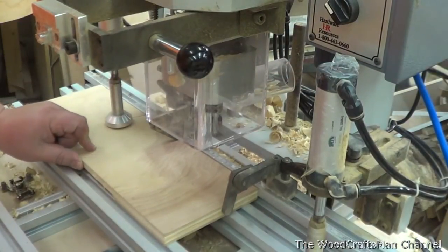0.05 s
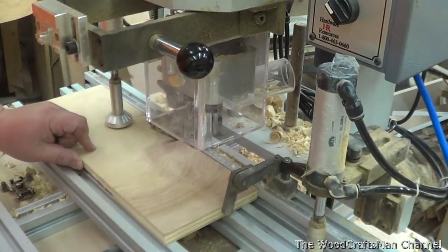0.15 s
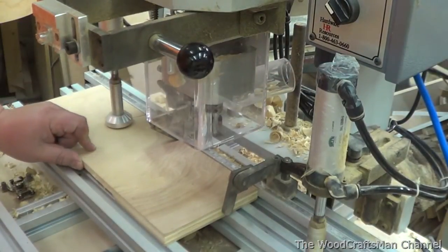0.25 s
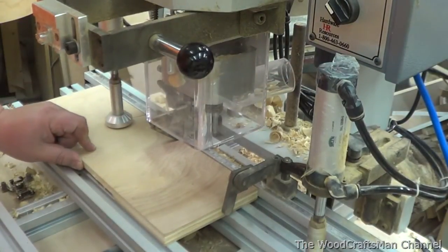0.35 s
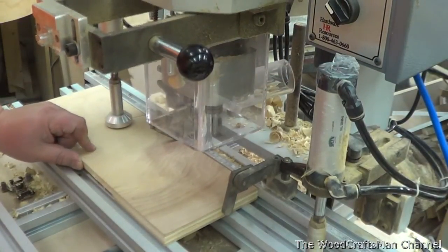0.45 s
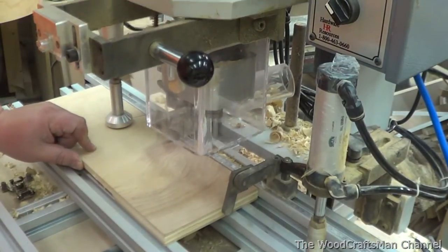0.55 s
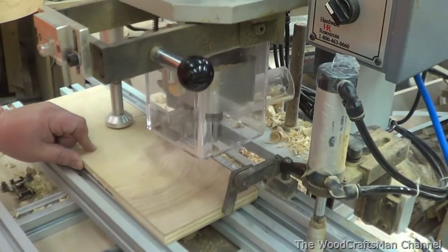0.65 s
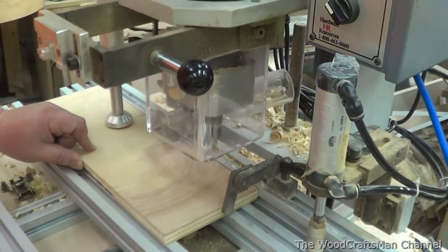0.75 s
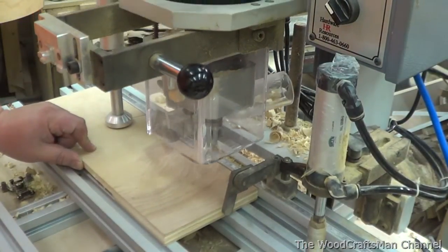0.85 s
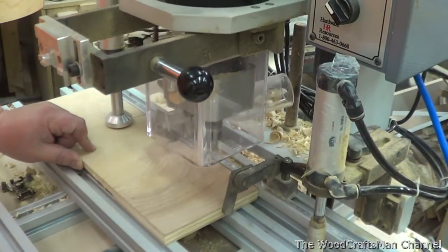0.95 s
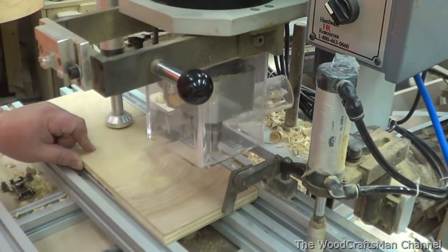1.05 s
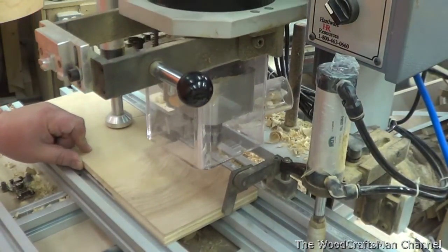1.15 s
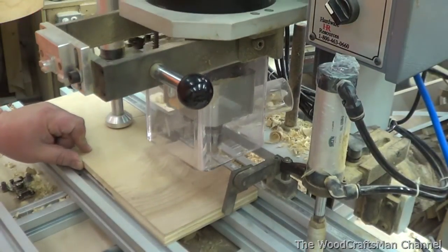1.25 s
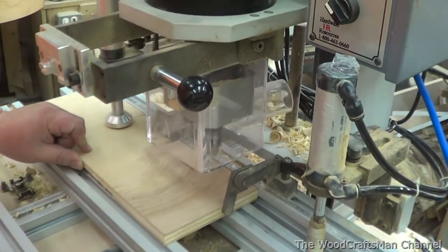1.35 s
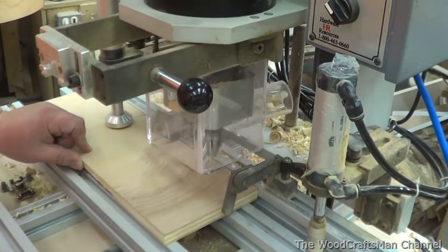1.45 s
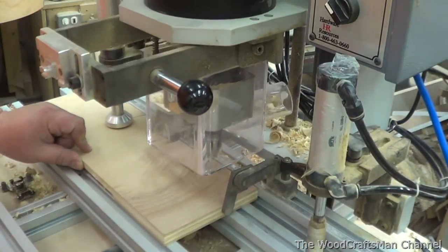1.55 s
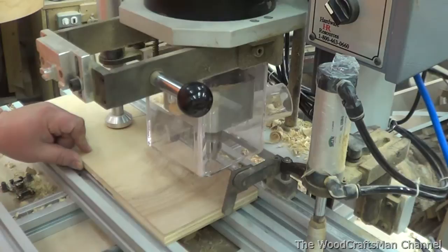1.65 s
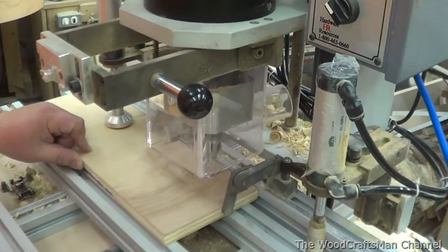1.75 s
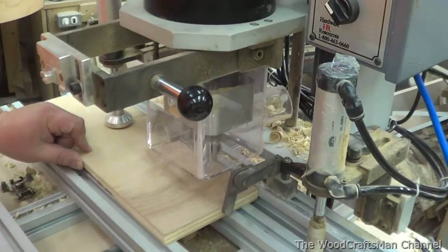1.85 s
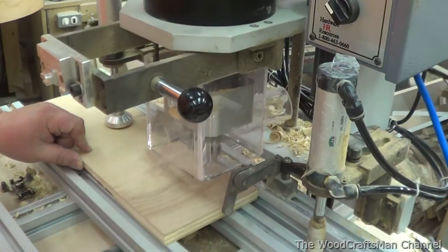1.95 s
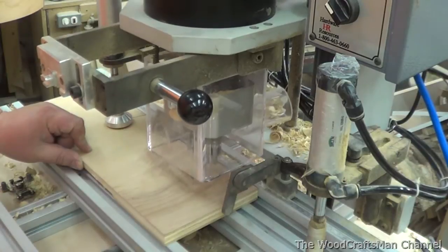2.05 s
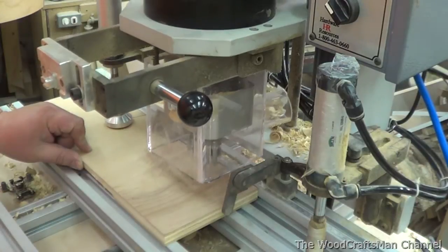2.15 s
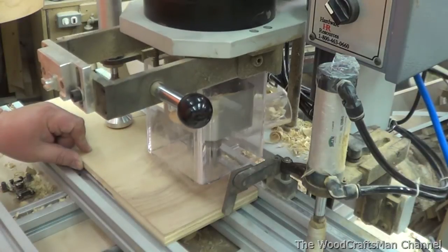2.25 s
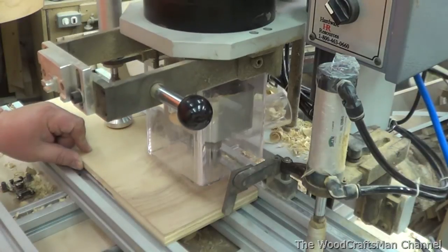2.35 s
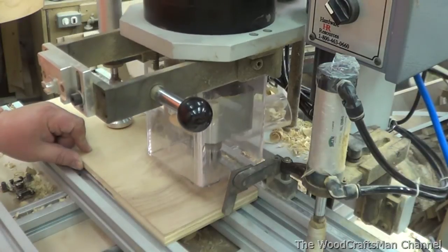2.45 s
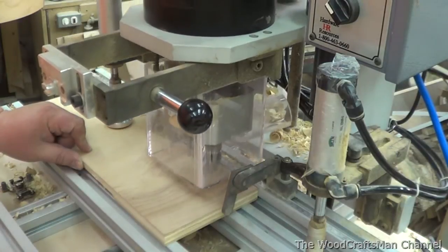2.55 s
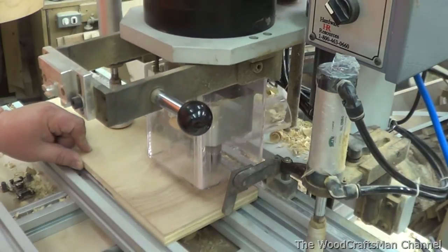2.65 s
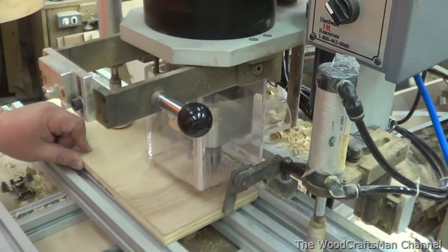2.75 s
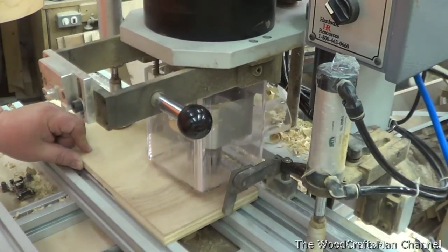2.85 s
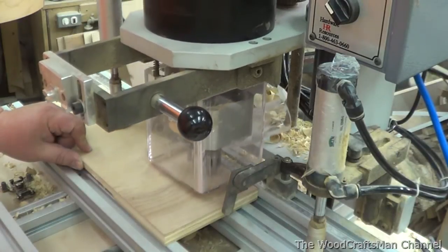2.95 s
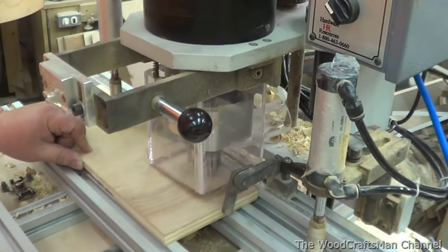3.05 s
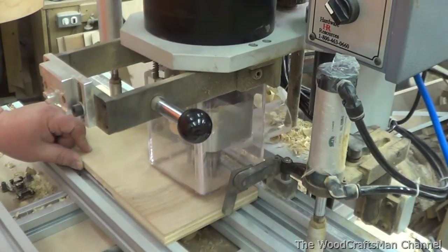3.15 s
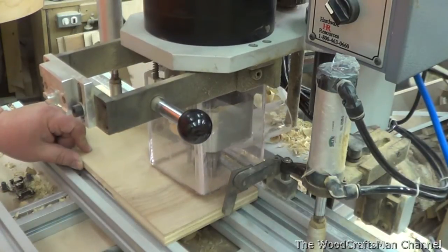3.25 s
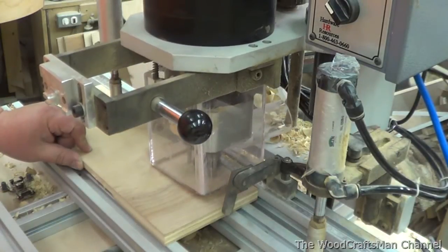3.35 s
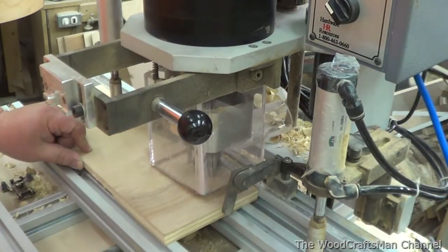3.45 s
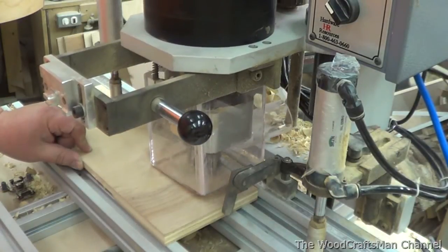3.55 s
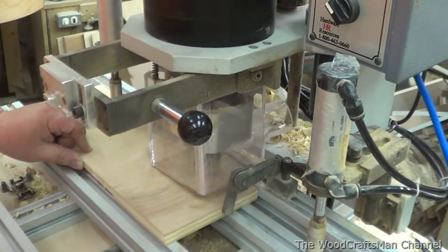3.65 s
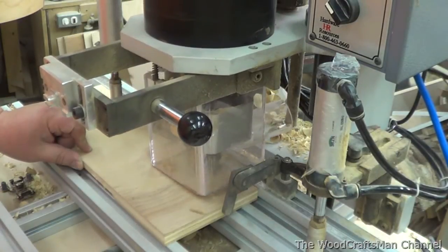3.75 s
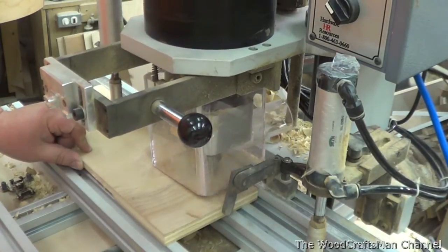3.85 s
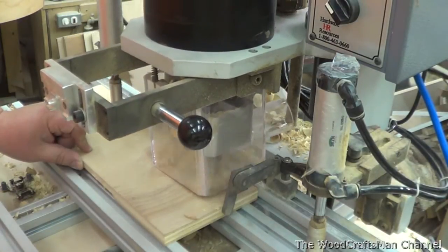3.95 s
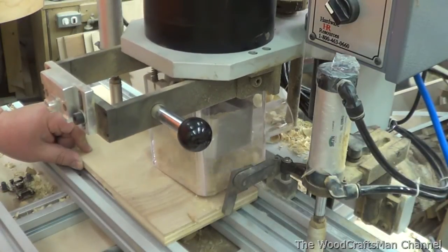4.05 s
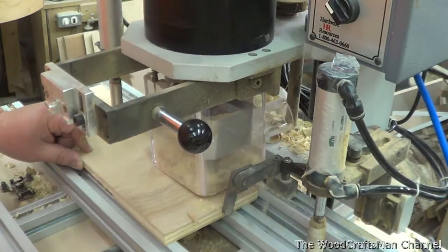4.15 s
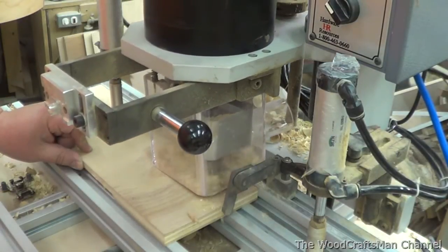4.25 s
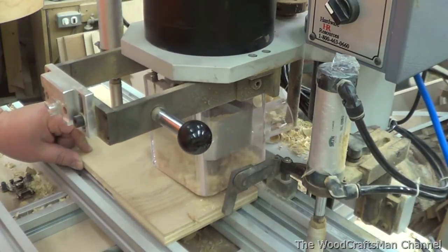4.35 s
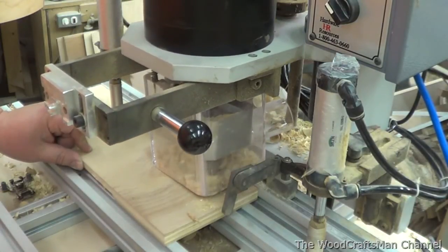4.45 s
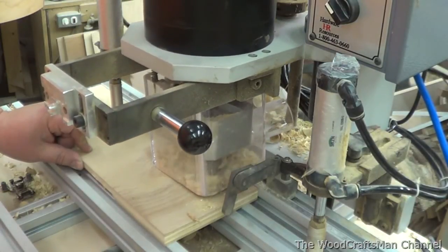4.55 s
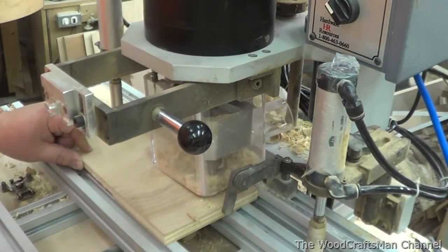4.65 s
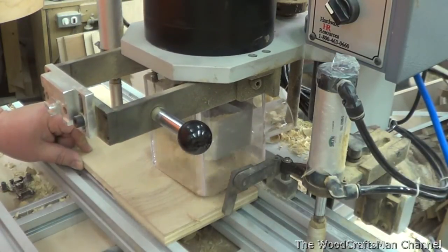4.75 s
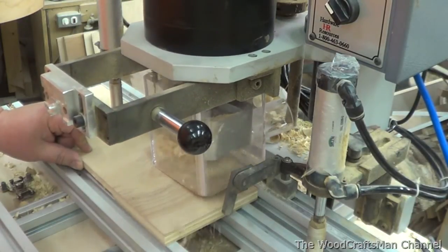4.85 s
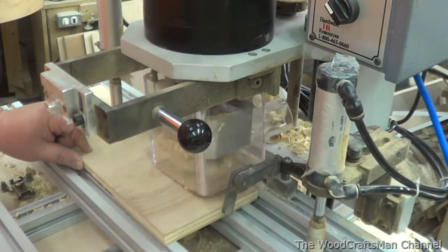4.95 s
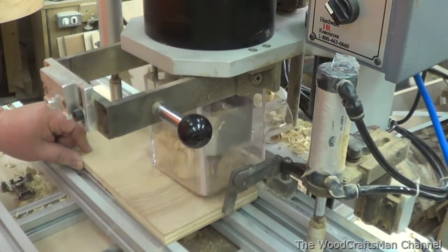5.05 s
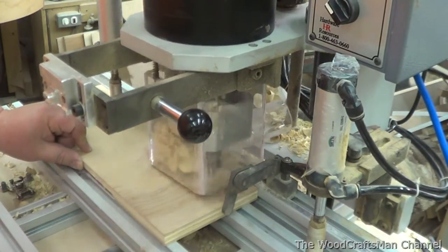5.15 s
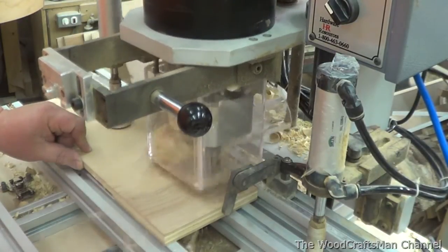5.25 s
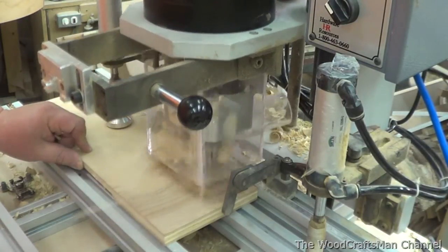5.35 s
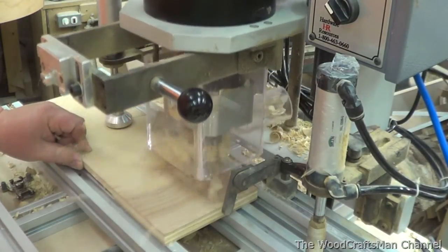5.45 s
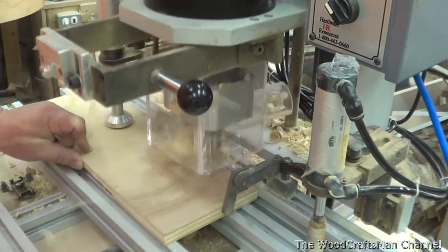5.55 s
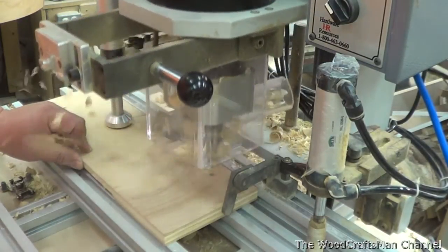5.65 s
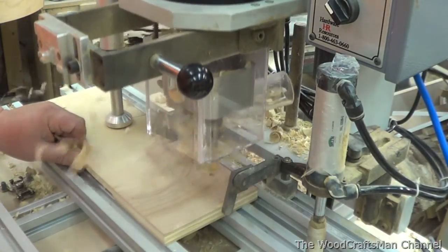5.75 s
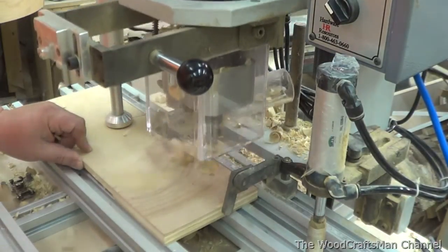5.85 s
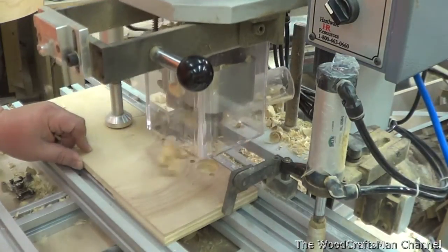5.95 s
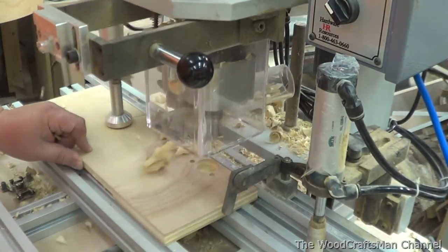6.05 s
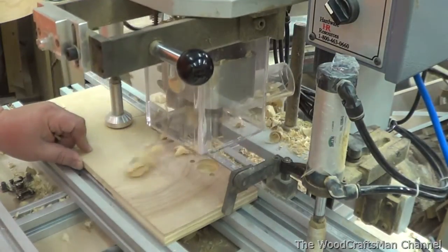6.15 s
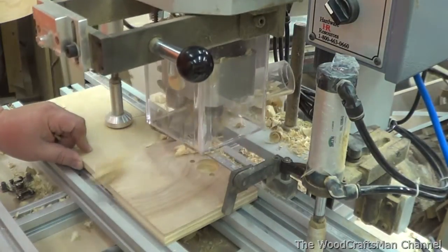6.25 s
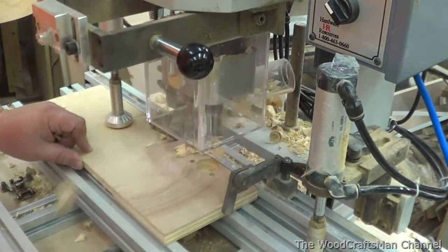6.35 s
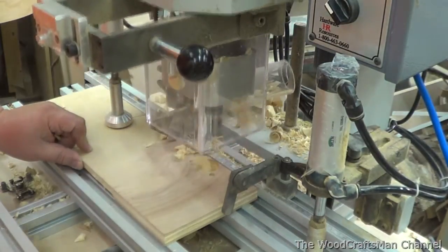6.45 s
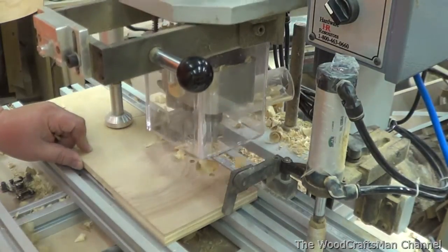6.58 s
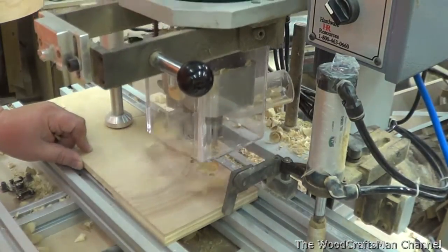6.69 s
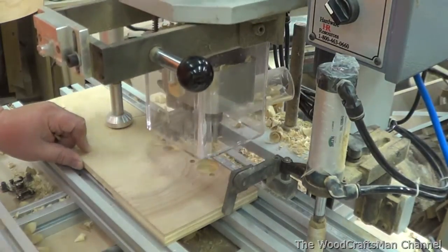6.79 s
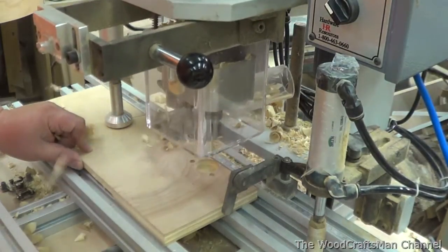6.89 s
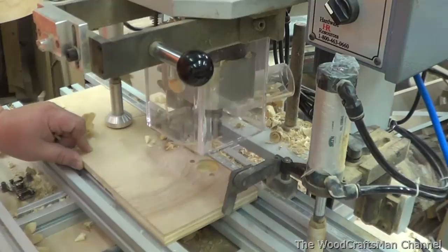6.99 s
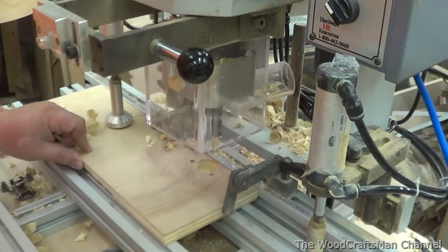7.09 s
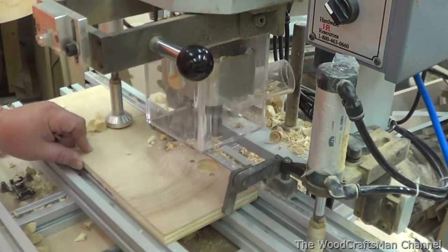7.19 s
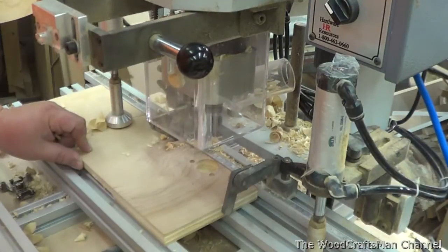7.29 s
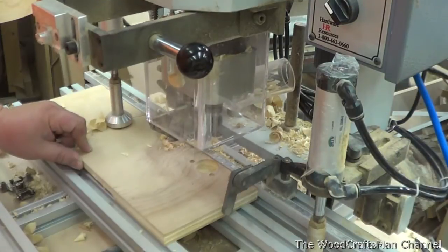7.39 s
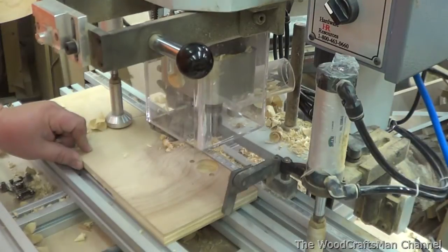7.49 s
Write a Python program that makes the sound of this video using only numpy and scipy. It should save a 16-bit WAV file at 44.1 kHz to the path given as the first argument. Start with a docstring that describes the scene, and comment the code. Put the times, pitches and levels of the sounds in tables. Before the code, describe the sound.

A close, dry stereo workshop pickup with little deep bass and loud sounds squeezed. A low distant-machine murmur, faint mains hum and fading hiss open the scene. At 0.37 s sharp contactor clicks, a tiny air spit and a dull table knock start a geared motor; its howl swoops up by 0.5 s into a steady, gritty metallic rattle with whine. Around 3.1 s bits touch plywood with a shudder and chatter, swelling into a bright tearing rasp from 3.3 to 4.3 s, wavering near 4 s. A harsher ringing scrape grows until 4.76 s. A click cuts power; bright air hiss blasts out, with slowing gears and rubbing bits around 5 s, whistles and a fuller rush from 5.3 to 5.8 s. The coasting rattle sinks. At 6.43 s clicks, a knock and a second howl mark a short jog, off at 6.7 s with a whistling air puff; gears coast down, with a soft knock at 7.3 s.

```python
"""A hinge boring machine, heard close up in a workshop: the motor spins up its gears, the head sinks,
the bits cut a plywood panel, the gears coast down, and the motor is jogged once more.
Gears, cutters and air are noise in their own resonances; shaft tones are sines at multiples of its speed.
Valves and contactors click, the cylinder vents with hiss and whistles, the table gives dull knocks;
behind lie a murmur of distant machines, mains hum and a fading hiss."""
import sys
import numpy as np
from scipy import signal
from scipy.fft import rfft, irfft, next_fast_len
from scipy.io import wavfile
from scipy.ndimage import uniform_filter1d

SR = 44100
rng = np.random.default_rng(int(sys.argv[2]) if len(sys.argv) > 2 else 0)


def master(y):
    """Save y as 16-bit WAV."""
    cut = np.clip(np.atleast_2d(y).T, -1, 1)
    pcm = np.round(cut * 32767)  # scale
    wavfile.write(sys.argv[1], SR, pcm.astype(np.int16))


N = 331664
T, SIZE = np.arange(N) / SR, next_fast_len(N + SR // 4)
HZ = np.fft.rfftfreq(SIZE, 1 / SR)

# Bands in which noises are levelled (Hz)
MIDDLE, TOP, HIGH, ALL = (900, 3000), (5000, 12000), (7000, 15000), (40, 15000)
FULL_SPEED, MAINS_HZ = 59.87, 60  # unloaded shaft in turns per s; mains in Hz

# The motor's runs. Each row: on in seconds, off in seconds, spin-up in seconds, spin-up curvature,
# coasting loss in turns per s2, rattle in dB, howl peak in seconds, howl in dB, howl swell in dB per s
RUNS = [(.375, 4.76, .111, 2.1, 21, -21.2, .483, -15.5, 35),
        (6.425, 6.705, .165, 1.1, 11.6, -23.5, 6.545, -16, 250)]
# The bits shear chips. One row: full in seconds, end in seconds, rasp in dB, strongest tone in dB,
# rise in dB per s, fall in dB per s
CUT = (3.34, 4.28, -17.5, -33, 42, 150)
# The slowing bits rub in their holes. One row, with the columns of CUT
RUBBING = (4.9, 5.18, -25, -44, 45, 70)


def amp(db):
    """Decibels to gain."""
    return 10 ** (np.asarray(db) / 20)


def read(points, hz):
    """Reads a table along log frequency."""
    f, value = np.transpose(points)
    return np.interp(np.log(hz + 1), np.log(f + 1), value)


def held(full, end, db, rise_db_s, fall_db_s):
    """Gain that rises, holds from full to end, and falls."""
    return amp(db - rise_db_s * np.maximum(full - T, 0) - fall_db_s * np.maximum(T - end, 0))


def stage(full, end, rasp_db, tone_db, rise_db_s, fall_db_s):
    """Gains of rasp and tones for one stage of the hole."""
    rasp = held(full, end, rasp_db, rise_db_s, fall_db_s)
    return rasp, held(full, end, tone_db, rise_db_s, fall_db_s)


def drift(fastest_hz):
    """Slow random wander of rms 1, summed from sines of random phase."""
    at = np.arange(0, N + 256, 256) / SR
    rates = fastest_hz * np.linspace(.05, 1, 12)
    wander = sum(np.sin(2 * np.pi * (f * at + rng.random())) for f in rates)
    return np.interp(T, at, wander / np.sqrt(6))


def coloured(x, gain, band):
    """Filters x and sets its rms within the band to 1."""
    z = rfft(x, SIZE) * gain
    inside = (HZ > band[0]) & (HZ < band[1])
    return irfft(z, SIZE)[:N] / np.sqrt(2 * np.sum(abs(z[inside]) ** 2) / SIZE / N)


def rings(modes):
    """Gain of summed resonance peaks."""
    power = sum(amp(2 * db) / (1 + (2 * (HZ - hz) / width) ** 2) ** 2 for hz, width, db in modes)
    return np.sqrt(power)


def resonate(x, hz, width):
    """A resonance that follows the curve hz: shift down to 0 Hz, smooth twice, shift back."""
    turn, r = np.exp(2j * np.pi * np.cumsum(hz) / SR), np.exp(-np.pi * width / SR)
    smooth = signal.lfilter([1 - r], [1, -r], x / turn)
    smooth = signal.lfilter([1 - r], [1, -r], smooth)
    return 2 * (turn * smooth).real


def fuzzy(hz, width):
    """Noise through a moving resonance, rms 1."""
    x = resonate(rng.standard_normal(N), hz, width)
    return x / x.std()


def bands(rows, width, rise_db_s, fall_db_s):
    """Gliding bands of noise, one for each row."""
    total = 0
    for full, end, hz0, hz1, db in rows:
        glide = np.clip((T - full) / (end - full), -.3, 1.3)  # runs on a little at both ends
        gain = held(full, end, db, rise_db_s, fall_db_s)
        total = total + gain * fuzzy(hz0 + (hz1 - hz0) * glide, width)
    return total


def turning(turns, throb, repeat, spiky_db):
    """Noise that throbs once and twice a turn; a share of its treble comes back alike on every turn."""
    once = rfft(rng.standard_normal(512))
    once[:46] = 0  # only the treble repeats
    pattern = irfft(once)[(turns % 1 * 512).astype(int)]
    spikes = amp(spiky_db * uniform_filter1d(rng.standard_normal(N), size=25) * 5)
    grit = spikes * rng.standard_normal(N)
    beat = 1 + throb * (np.cos(2 * np.pi * turns) + 0.68 * np.cos(4 * np.pi * turns + 1.06))
    return beat * (grit / grit.std() + repeat * pattern)


def tones(orders, turns, waver_db):
    """Sines at multiples of the shaft speed, each wavering in level."""
    total = 0
    for multiple, db in orders:
        sine = np.sqrt(2) * np.sin(2 * np.pi * (multiple * turns + rng.random()))
        total = total + amp(db + waver_db * drift(16.)) * sine
    return total


def hits(events, gain, band, rise_s):
    """Bursts of coloured noise that die at their own speed."""
    shape = np.zeros(N)
    for s, db, t60 in events:
        after = np.maximum(T - s, 0)
        shape += amp(db - 60 * after / t60) * (1 - np.exp(-after / rise_s))
    return shape * coloured(rng.standard_normal(N), gain, band)


def shop():
    """Workshop background: low murmur of distant machines, steady mains hum and a fading bright hiss."""
    # Murmur, fading at first. Each row: time in seconds, level in dB
    murmur_level = [(0, -42.5), (.15, -46.5), (.355, -51.5)]
    # Colour of the murmur. Each row: frequency in Hz, gain in dB
    murmur_tone = [(24, -59), (40, -37), (114, -38), (166, -18), (353, -1.5), (526, -7), (596, -15),
                   (659, -6), (2420, -23), (14700, -11), (15800, -14)]
    # The hiss as it fades. Each row: time in seconds, level in dB
    hiss_level = [(0.0, -42), (0.355, -53.5)]
    # Mains hum. Each row: frequency in Hz, rms level in dB
    hum_lines = [(120, -74), (298, -67), (360, -62), (478, -63), (598, -58), (958, -63)]
    murmur = coloured(rng.standard_normal(N), amp(read(murmur_tone, HZ)), ALL)
    murmur = amp(np.interp(T, *np.transpose(murmur_level))) * murmur
    hiss = coloured(rng.standard_normal(N), np.clip(HZ / 1500, 0, 1), ALL)
    hiss = amp(np.interp(T, *np.transpose(hiss_level))) * hiss
    hum = sum(amp(db) * np.sqrt(2) * np.sin(2 * np.pi * (hz * T + rng.random())) for hz, db in hum_lines)
    return murmur + hiss + hum


def knocks():
    """Dull knocks on the table: low resonances that swell softly and die away."""
    # Each row: start in seconds, level in dB before the soft rise, time to fall 60 dB in seconds
    table_knocks = [(0.399, -21, 0.31), (6.419, -27, 0.3), (7.305, -27, 0.12)]
    return hits(table_knocks, rings([(150, 90, 8), (315, 220, 13)]), ALL, rise_s=0.024)


def clicks():
    """Valve and contactor clicks: very short bursts of bright noise."""
    # Each row: start in seconds, level in dB before the rise
    click_times = [(0.3621, -20), (0.3743, -7), (0.3874, -11), (4.7514, -11), (6.4268, -10), (6.4464, -14),
                   (6.6963, -14), (6.7084, -17)]
    # Colour of the clicks. Each row: frequency in Hz, gain in dB
    click_tone = [(500, -50), (2000, -38), (4500, -2.5), (7000, 3), (12000, 1), (15800, -3)]
    events = [(s, db, .035) for s, db in click_times]  # each falls 60 dB in .035 s
    return hits(events, amp(read(click_tone, HZ)), ALL, rise_s=0.00038)


def air():
    """Turbulent hiss from the exhaust port, sharper at high pressure, with fuzzy whistles."""
    # Venting air. Each row: full in seconds, valve shut in seconds, hiss in dB, rise in dB per s,
    # fall in dB per s, pressure from 0 to 1
    vents = [(.393, .397, -15, 800, 580, .4), (4.768, 5.8, -9, 800, 120, .58),
             (5.4, 5.82, -7.5, 30, 240, .08), (6.427, 6.43, -17, 2000, 330, .6),
             (6.728, 6.775, -6.5, 550, 130, .1), (6.716, 6.87, -17.5, 2000, 75, .55)]
    # Whistles. Each row: full in seconds, end in seconds, start in Hz, end in Hz, dB over the hiss
    whistles = [(5.33, 5.56, 5200, 5050, -8), (5.2, 5.5, 4400, 4600, -10), (5.6, 5.73, 4520, 4480, -8.5),
                (5.2, 5.36, 3800, 3950, -10), (6.73, 6.78, 5150, 5040, -7.5), (6.73, 6.77, 5700, 5600, -12),
                (6.73, 6.82, 4030, 3950, -10), (6.8, 6.95, 9350, 9250, -5), (5.72, 5.92, 9050, 9000, -9)]
    # Colours of the hiss at high and at low pressure. Each row: frequency in Hz, gain in dB
    blast_tone = [(100, -70), (650, -20), (1100, 4), (1290, 7.5), (2620, -4.5), (4630, 0), (5990, -18),
                  (7570, 13.5), (10500, 11.5), (12600, 10), (15800, -16)]
    soft_tone = [(100, -75), (650, -29), (1100, -20), (2810, -16), (3070, -2.5), (3470, -11), (3750, -10),
                 (5070, 0.5), (5600, -4), (12200, -1), (15800, -6)]
    turbulence = amp(1.1 * uniform_filter1d(rng.standard_normal(N), size=36) * 6)
    jet = turbulence * rng.standard_normal(N)
    flows = np.array([held(*row[:5]) for row in vents])
    pressure = np.transpose(vents)[5]
    blast = pressure @ flows * coloured(jet, amp(read(blast_tone, HZ)), HIGH)
    soft = (1 - pressure) @ flows * coloured(jet, amp(read(soft_tone, HZ)), HIGH)
    whistling = flows.sum(0) * bands(whistles, width=380.0, rise_db_s=90., fall_db_s=120.)
    return blast + soft + whistling


def panel(turns, chips):
    """The panel rumbles and shudders under the bits; two edges biting on each turn make it throb."""
    # Shudders. Each row: peak in seconds, rumble in dB
    shudders = [(3.165, -27.5), (3.96, -34), (4.28, -32)]
    cut, _ = stage(*CUT)
    rubbing, _ = stage(*RUBBING)
    biting = cut / cut.max()
    shake = amp(-44) * biting + amp(-7) * rubbing
    shake = shake + sum(held(s, s, db, rise_db_s=85, fall_db_s=70) for s, db in shudders)
    rumble = shake * coloured(chips, rings([(410, 144, 0), (630, 230, -2)]), ALL)
    throb = amp(-60) * biting + held(3.85, 3.85, -48, rise_db_s=35, fall_db_s=70)
    return rumble + throb * tones([(2, 0)], turns, waver_db=4.0)


def shearing(turns, chips):
    """Cutting edges rasp through the plies, ring at multiples of the shaft and chatter."""
    # Colour of the rasp. Each row: frequency in Hz, gain in dB
    cut_tone = [(24, -65), (40, -50), (596, -18.5), (825, -10.5), (1260, -2.5), (1880, -6), (2540, -4),
                (5670, -1), (7650, -0.5), (12300, -4.5), (15800, -15)]
    # Resonances of the rasp. Each row: frequency in Hz, width in Hz, gain in dB
    cut_ring = [(2630, 32, 3), (3240, 200, 0), (3900, 170, -1), (4960, 230, -4), (7860, 410, 1),
                (8650, 540, -2), (9700, 580, 0), (12140, 200, 1), (13500, 1300, -21)]
    # Shaft tones. Each row: multiple of the shaft speed, level in dB
    cut_orders = [(4, -23), (5, -18), (7, -15), (8, -13), (10, -10), (11, -14), (19, -8), (20, -5),
                  (21, -5), (22, -6), (24, -7), (25, -9), (36, -10), (37, -6), (42, -9), (43, 0), (44, -5),
                  (48, -8), (49, -7)]
    # Bits chatter at a change of ply. Each row: full in seconds, end in seconds, start in Hz,
    # end in Hz, level in dB
    chatter = [(3.14, 3.36, 3650, 4250, -25), (3.95, 4.0, 2180, 2190, -23.5)]
    rasp_gain, tone_gain = stage(*CUT)
    rasp = coloured(chips, amp(read(cut_tone, HZ)), TOP) + 0.35 * coloured(chips, rings(cut_ring), TOP)
    return (rasp_gain * rasp + tone_gain * tones(cut_orders, turns, waver_db=4.5)
            + bands(chatter, width=520.0, rise_db_s=110., fall_db_s=70.))


def scraping(turns):
    """The cup bit scrapes the bottom of its hole with growing tones; later the slowing bits rub."""
    # Scraping the bottom. One row, with the columns of CUT
    bottom = (4.31, 4.76, -24.5, -27, 700, 2000)
    # Colour of the scrape. Each row: frequency in Hz, gain in dB
    bottom_tone = [(24, -69), (40, -48), (189, -31), (296, -11), (420, -9), (476, -13), (1060, -3.5),
                   (1330, -3.5), (1540, -3), (7650, -3.5), (15800, -15)]
    # Resonances of the scrape. Each row: frequency in Hz, width in Hz, gain in dB
    bottom_ring = [(3280, 65, -6), (3690, 24, 2), (5370, 84, -1), (6450, 190, -20), (7160, 52, -6),
                   (8750, 35, 9), (9300, 31, 1), (12100, 320, -13)]
    # Shaft tones. Each row: multiple of the shaft speed, level in dB
    bottom_orders = [(2, -30), (4, -18), (5, -8), (6, -17), (7, -13), (8, -5), (9, -13), (10, -7), (11, -9),
                     (12, -14), (15, -13), (20, -12), (22, 0), (23, -4), (24, -8), (25, -11), (27, -6),
                     (30, -11), (31, -7), (32, -7), (33, 0), (35, -6), (39, -9), (44, -9)]
    dust = turning(turns, throb=0.08, repeat=0.88, spiky_db=5.0)
    scrape = 1.47 * coloured(dust, amp(read(bottom_tone, HZ)), MIDDLE)
    scrape = scrape + 0.76 * coloured(dust, rings(bottom_ring), ALL)
    bottom_gain, tone_gain = stage(*bottom)
    rubbing, rub_gain = stage(*RUBBING)
    tone_gain = tone_gain * held(bottom[1], bottom[1], 0, rise_db_s=7, fall_db_s=0)
    rub_orders = [(2, -9), (4, -7), (5, 0), (8, -8), (10, -8), (14, -7)]
    return ((bottom_gain + rubbing) * scrape + tone_gain * tones(bottom_orders, turns, waver_db=2.0)
            + rub_gain * tones(rub_orders, turns, waver_db=3.))


def bits(turns):
    """The bits at work: one noise of chips drives both the rasp and the panel, then comes the scrape."""
    chips = turning(turns, throb=0.13, repeat=0.55, spiky_db=0.0)
    return shearing(turns, chips) + scraping(turns) + panel(turns, chips)


def shaft():
    """Turns per second: spins up when switched on, sags under load, coasts down when switched off."""
    # The load slows the shaft. Each row: time in seconds, loss in turns per s
    sag = [(.5, 0), (3.3, .07), (3.6, .67), (3.75, .62), (4.0, 1.12), (4.2, .92), (4.3, .22), (4.76, .17),
           (6.4, 0)]
    speed = np.full(N, 10.)  # the first run kicks off at this speed
    for on, off, spin, curve, loss, *_ in RUNS:
        start = speed[int(on * SR)]
        run = start + (FULL_SPEED - start) * np.clip((T - on) / spin, 0, 1) ** curve
        coast = loss * np.maximum(T - off, 0)
        rub = 6.5 * np.clip(T - off, 0, max(RUBBING[1] - off, 0))  # rubbing bits cost turns per s2
        speed = np.where(T >= on, run - coast - rub, speed)
    return uniform_filter1d(speed, size=800) - np.interp(T, *np.transpose(sag))


def gear_levels(speed):
    """Gains of driven rattle, loose rattle, shaft tones, coasting tones and howl from switch and speed."""
    lack = FULL_SPEED - speed
    switch_db_s = 2500  # how fast a switched sound starts or stops
    damped_s = 3.13  # the biting bits take up the slack and still the gears
    still = held(0, damped_s, 0, 0, fall_db_s=55)
    rattle = tone = howl = coasting = 0
    next_on = [RUNS[1][0], N / SR]
    for (on, off, _, _, _, rattle_db, peak, howl_db, swell), after in zip(RUNS, next_on):
        live = held(on + .004, off, 0, switch_db_s, switch_db_s) * (still if on < damped_s else 1)
        grip = held(on + .03, off, 0, 500, 0)
        rattle = rattle + live * amp(rattle_db - .18 * lack)
        arrival = held(peak, peak + .02, -25, rise_db_s=250, fall_db_s=260)  # tones peak with the howl
        tone = tone + live * (amp(rattle_db - 6 - .6 * lack) + arrival)
        howl = howl + live * grip * (held(peak, peak, howl_db, swell, fall_db_s=330) + amp(-42))
        coasting = coasting + held(off, after, 0, switch_db_s, switch_db_s)
    loose = coasting * amp(-26 - .06 * lack)
    return rattle, loose, tone, coasting * amp(-39 - .4 * lack), howl


def driven_rattle(turns):
    """Gears under power rattle in their housing, with a short bright rasp twice a turn."""
    # How far the head has sunk. Each row: time in seconds, depth from 0 up to 1 down
    head = [(0, 0), (2.2, .1), (2.7, 0.36), (5.3, 1), (5.8, 0)]
    # Colour of the rattle. Each row: frequency in Hz, gain in dB
    drive_tone = [(24, -78), (40, -41), (868, -9.5), (983, -6), (1330, -5.5), (1840, -8.5), (2250, -4),
                  (4200, -8.5), (5670, -4.5), (6750, -10.5), (8450, -7), (12000, -18), (15800, -25)]
    # Housing resonances with the head up and down. Each row: frequency in Hz, width in Hz, gain in dB
    up_ring = [(513, 40, -4.5), (850, 44, -2.5), (1410, 270, 2), (2247, 160, 3.5), (2498, 60, 7.5),
               (2963, 110, 4), (3430, 140, 2), (5500, 140, 1), (6180, 110, 6.5), (8280, 270, 4),
               (9300, 200, 0.5), (11630, 200, 4.5)]
    low_ring = [(1220, 220, -7), (2510, 39, -13), (3030, 260, -4), (3710, 140, -0.5), (4900, 270, -6),
                (5840, 87, 5.5), (6240, 84, 8.5), (7100, 37, -13), (8300, 100, -27)]
    driven = turning(turns, throb=0.11, repeat=0.49, spiky_db=1.5)
    sunk = np.interp(T, *np.transpose(head))  # the housing rings differently near the panel
    ring = .5 * (1 - sunk) * coloured(driven, rings(up_ring), MIDDLE)
    ring = ring + .5 * sunk * coloured(driven, rings(low_ring), MIDDLE)
    halves = 2 * turns  # slack in the teeth gives a rasp of chance size twice a turn
    chance_db = 4.4 * rng.standard_normal(1024).clip(-2, 2)[halves.astype(int)]
    rasps = amp(chance_db - 30 * (halves % 1)) * rng.standard_normal(N)
    ticking = amp(-6.5) * (1 - 0.64 * sunk) * coloured(rasps, rings([(12100, 1900, 0)]), ALL)
    return 1.07 * coloured(driven, amp(read(drive_tone, HZ)), MIDDLE) + ring + ticking


def loose_rattle(turns):
    """Coasting gears rattle without load, in a colour and resonances of their own."""
    # Colour of the rattle. Each row: frequency in Hz, gain in dB
    coast_tone = [(24, -79), (40, -47), (410, -14), (526, -16.5), (728, -7.5), (1140, -5), (1700, -4.5),
                  (2420, -5), (4200, -8), (6110, -3.5), (6750, -9.5), (8890, -5), (15800, -13)]
    # Housing resonances. Each row: frequency in Hz, width in Hz, gain in dB
    coast_ring = [(527, 34, 2), (1076, 260, -4.5), (1330, 100, -1), (2373, 150, 4), (2950, 190, -3.5),
                  (3450, 105, 2), (5500, 200, -13), (6180, 67, 9.5), (9000, 610, -1), (11940, 390, -5)]
    loose = turning(turns, throb=0.088, repeat=0.68, spiky_db=-2.5)
    rattle = 0.88 * coloured(loose, amp(read(coast_tone, HZ)), MIDDLE)
    return rattle + .5 * coloured(loose, rings(coast_ring), MIDDLE)


def shaft_whine(speed, turns):
    """Shaft tones; the high ones meet the housing rings near full speed and fade steeply below it."""
    # Each row: multiple of the shaft speed, level in dB
    drive_orders = [(4, -27), (6, -23), (8, -21), (9, -15), (12, -19), (14, -14), (15, -11), (18, -15),
                    (19, -11), (20, -8), (21, -8), (22, 0), (23, -6), (24, -5), (25, -6), (29, -12),
                    (33, -10), (37, -10), (38, -11), (42, -11), (43, -7)]
    low = [row for row in drive_orders if row[0] <= 26]
    high = [row for row in drive_orders if row[0] > 26]
    tuned = (speed / MAINS_HZ) ** 14
    return tones(low, turns, waver_db=2.1) + tuned * tones(high, turns, waver_db=2.5)


def mesh_howl(speed):
    """Howl of the teeth meshing, with its octave; starting torque shudders with the mains."""
    teeth = 22
    mesh = fuzzy(teeth * speed, width=520.0)
    # the frame booms as the howl passes its resonances
    mesh = mesh + sum(1.6 * resonate(mesh, np.full(N, frame_hz), 96.0) for frame_hz in (370., 530.))
    mesh = mesh + .35 * fuzzy(2 * teeth * speed, width=700.)
    return mesh * (1 + 0.49 * np.cos(2 * np.pi * MAINS_HZ * T))


def gearbox(speed, turns):
    """Rattle in the housing, shaft tones, and the howl of the teeth meshing."""
    # Tones that stand out while coasting. Each row: multiple of the shaft speed, level in dB
    coast_orders = [(12, -6), (20, -3), (22, 0)]
    driven_gain, loose_gain, whine_gain, coast_gain, howl_gain = gear_levels(speed)
    tonal = whine_gain * shaft_whine(speed, turns) + howl_gain * mesh_howl(speed)
    tonal = tonal + coast_gain * tones(coast_orders, turns, waver_db=3.)
    # the small housing radiates little bass
    tonal = signal.lfilter(*signal.butter(2, 220, "high", fs=SR), tonal)
    return driven_gain * driven_rattle(turns) + loose_gain * loose_rattle(turns) + tonal


def patchy(x, patchy_db, flicker_db):
    """Chips and vibration shift the colour in small patches; the treble flickers as a whole."""
    hz, _, z = signal.stft(x, SR, nperseg=512, noverlap=384)
    field = uniform_filter1d(rng.standard_normal(z.shape), size=6, axis=0)
    field = uniform_filter1d(field, size=20, axis=1)
    shared = uniform_filter1d(rng.standard_normal(z.shape[1]), size=8)
    flicker = np.outer(np.clip(hz / 9000, 0, 1), shared / shared.std())
    db = patchy_db * field / field.std() + flicker_db * flicker
    return signal.istft(z * amp(db), SR, nperseg=512, noverlap=384)[1][:N]


def two_ports(x):
    """Two close microphone ports: a room echo of opposite sign in each, and a small lead and lean."""
    # Likeness of the ports. Each row: frequency in Hz, likeness from 0 to 1
    same = [(60, 0.99), (180, 0.99), (550, 0.44), (1650, 0.87), (4970, 0.92), (8000, .975), (15000, 1)]
    # Phase of the first port against the second. Each row: frequency in Hz, lead in rad
    lead = [(0, 0.94), (260, 0.63), (600, 0.13), (1380, 0), (2840, 0), (16100, -0.0)]
    # Level of the first port over the second. Each row: frequency in Hz, level in dB
    lean = [(60, 0.13), (180, -1.4), (550, -0.097), (1650, 1.0), (4970, 0.5), (15000, 0.4)]
    z = rfft(x, SIZE)
    echo = rng.standard_normal(11000) * amp(-60 * np.arange(11000) / SR / 0.24)  # t60 0.24 s
    unlike = np.sqrt((1 - np.clip(read(same, HZ), 0, 1)) / 2)
    unlike = unlike * rfft(echo / np.linalg.norm(echo), SIZE)
    tilt = amp(read(lean, HZ) / 2) * np.exp(.5j * read(lead, HZ))
    return irfft(np.array([z * (1 + unlike) * tilt, z * (1 - unlike) / tilt]), SIZE)[:, :N]


def scene():
    """All sources as they reach the two microphone ports."""
    speed = shaft()
    turns = np.cumsum(speed) / SR
    machine = patchy(gearbox(speed, turns) + bits(turns) + air(), patchy_db=0.5, flicker_db=0.59)
    return two_ports(machine + clicks() + knocks() + shop())


def record(dry):
    """The small microphone loses deep bass; a quick limiter ducks loud sound; peaks round off; band limit."""
    limit_db, limit_s, knee = -13.1, .008, 3.5
    thin = signal.lfilter(*signal.butter(1, 90, "high", fs=SR), dry)
    r = np.exp(-1 / (limit_s * SR))
    over = signal.lfilter([1 - r], [1, -r], (thin ** 2).mean(0)) / amp(2 * limit_db)  # power ratio
    ducked = thin / (1 + over ** knee) ** (.5 / knee)
    rounded = 0.84 * np.tanh(ducked / 1.123)
    lowpass = signal.firwin(511, 15850, window=("kaiser", 9), fs=SR)  # edge at 15850 Hz
    return signal.oaconvolve(rounded, lowpass[None], "same")


dry = scene()
out = record(dry)
master(out)
```